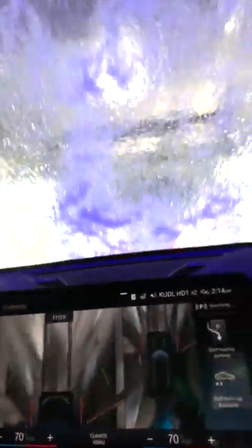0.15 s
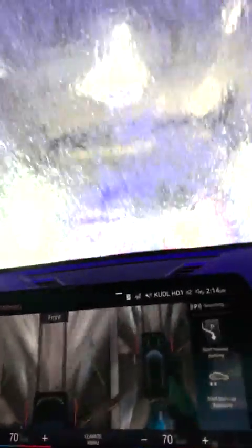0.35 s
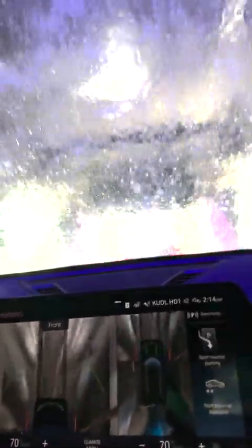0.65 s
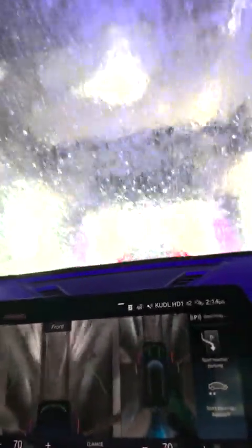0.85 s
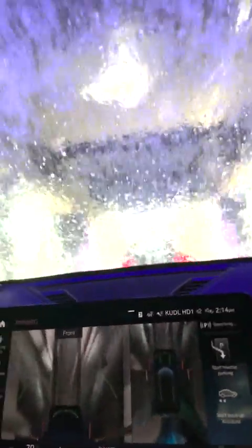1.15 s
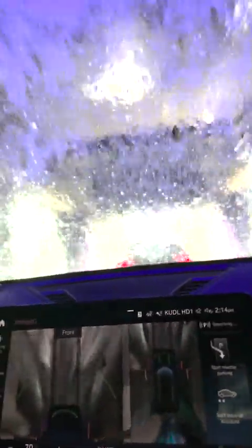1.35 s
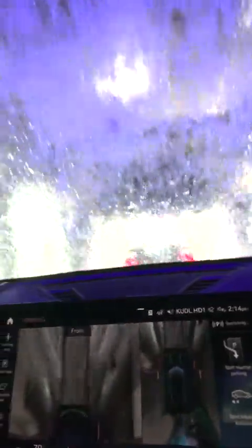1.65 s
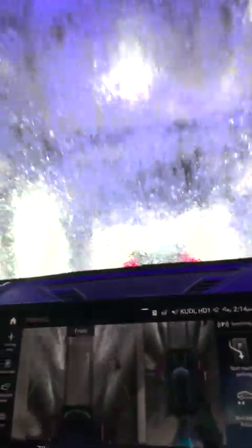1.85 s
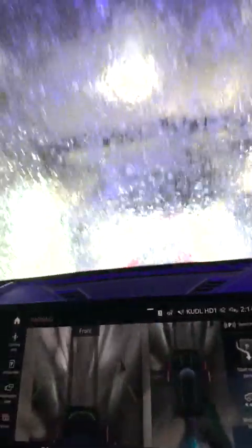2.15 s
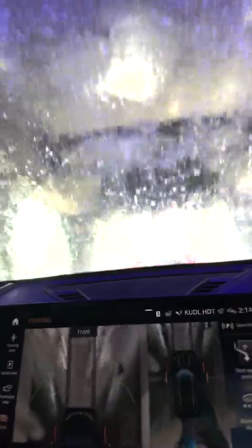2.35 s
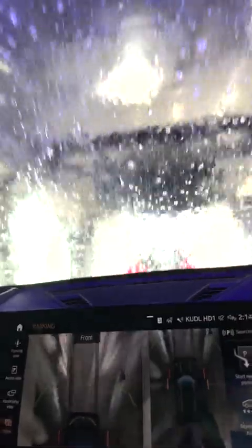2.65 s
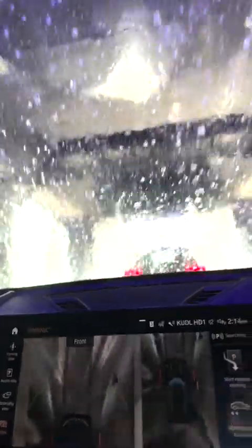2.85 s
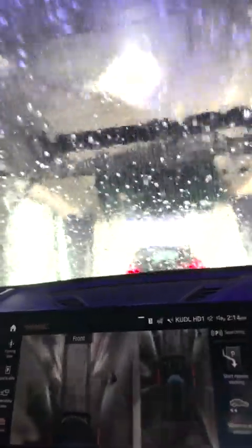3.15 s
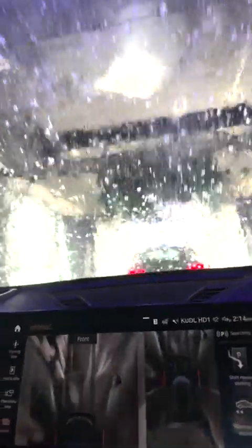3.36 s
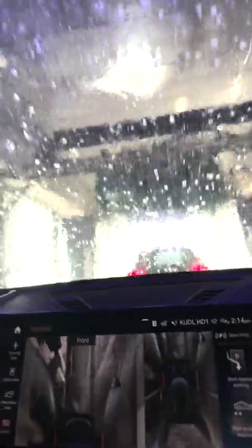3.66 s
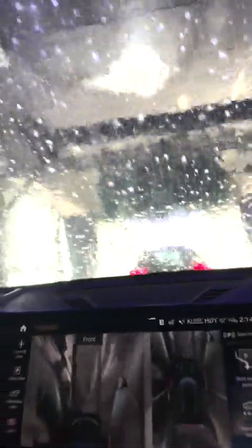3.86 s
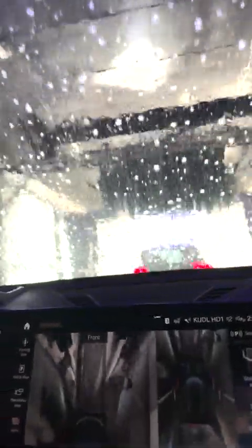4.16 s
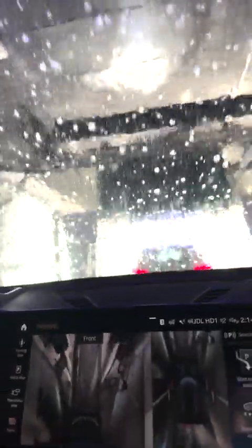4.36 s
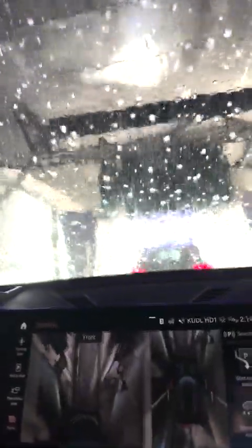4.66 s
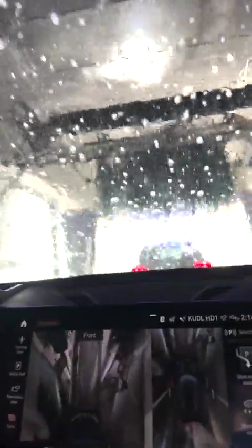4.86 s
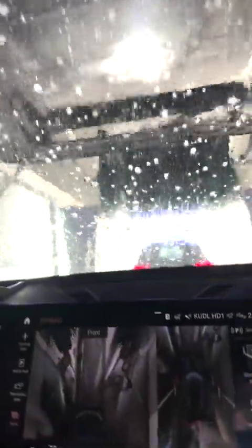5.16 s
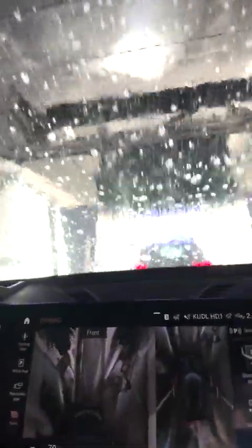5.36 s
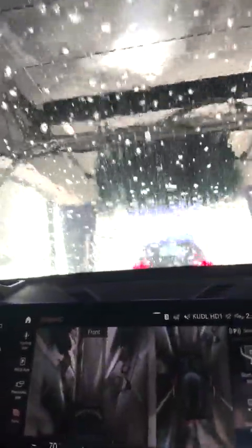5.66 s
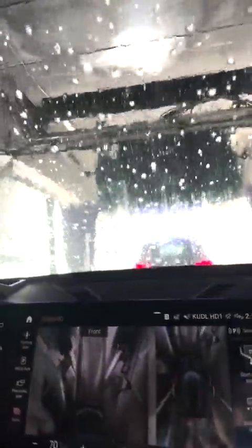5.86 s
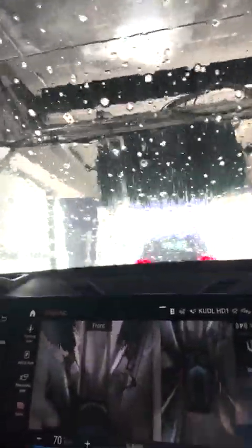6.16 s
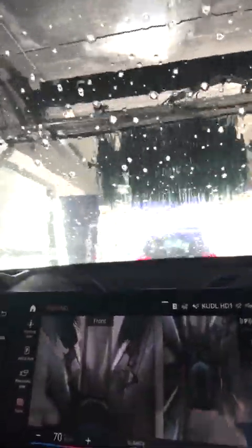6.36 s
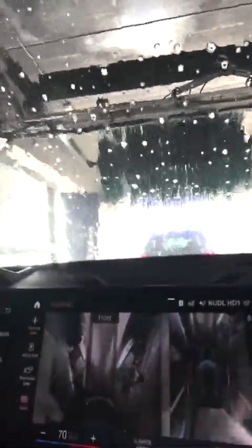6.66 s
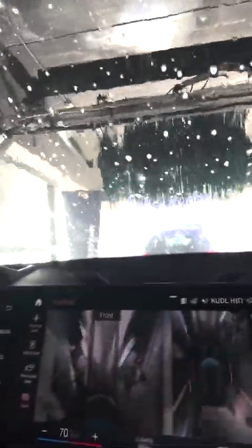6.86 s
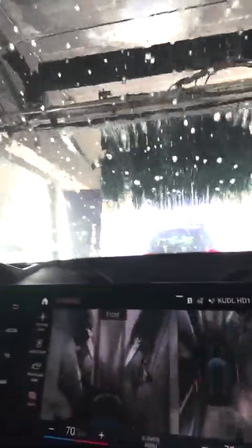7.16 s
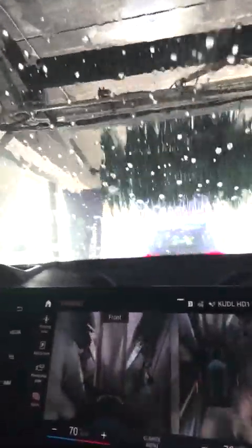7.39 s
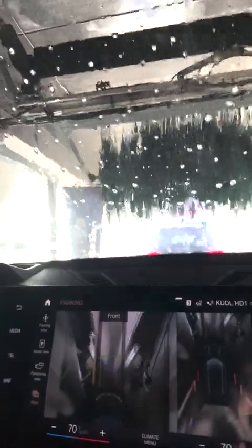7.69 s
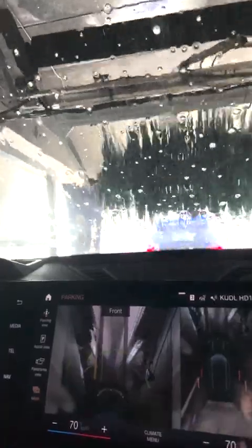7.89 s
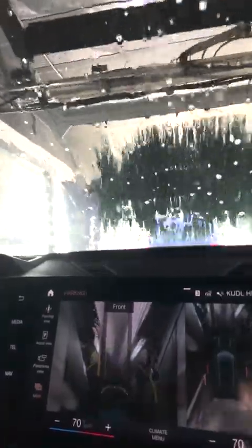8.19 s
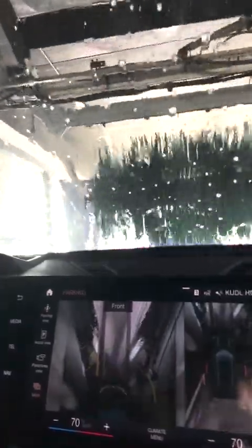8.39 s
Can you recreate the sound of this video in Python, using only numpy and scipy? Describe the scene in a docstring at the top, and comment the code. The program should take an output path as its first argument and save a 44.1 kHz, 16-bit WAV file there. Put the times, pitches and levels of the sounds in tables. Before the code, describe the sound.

Muffled car wash heard from the cabin: low rumble and thumps, swishing brushes, quick wet slaps, and a brief curtain of water across the roof.

```python
"""Wet brushes work over a closed car in a tunnel wash, heard from inside: cloth strips slap the doors
more than ten times a second, as swelling bursts of shaped noise over a steady swish and fizz.
A curtain of water, in patchy noise, patters on the windscreen and then drums along the roof; drops plink as damped tones.
Brushes and pumps shake the body: noise through resonances makes the cabin boom and the panels rumble, and blows thump.
Two close microphone ports hear the bass alike and the treble apart."""
import sys
import numpy as np
from scipy import signal
from scipy.fft import rfft, irfft, next_fast_len
from scipy.io import wavfile
from scipy.ndimage import uniform_filter1d, map_coordinates

SR = 44100
rng = np.random.default_rng(int(sys.argv[2]) if len(sys.argv) > 2 else 0)


def master_out(mix):
    """Clip the mix to full scale and print it as 16-bit PCM to the path in sys.argv[1]."""
    frames = np.transpose(np.atleast_2d(mix))
    ceiling = np.clip(frames, -1, 1)
    pcm = np.round(ceiling * 32767).astype(np.int16)
    wavfile.write(sys.argv[1], SR, pcm)


N = 376173

# How hard the body is shaken. Each row: time in seconds, cabin boom in dB, floor pan in dB, doors in dB.
SHAKING = [(0, -31.5, -31.5, -33), (.3, -30.5, -34, -33.5), (.9, -29.5, -34.5, -35.5),
           (1.4, -28.5, -31.5, -32.5), (2.0, -28.5, -34, -33.5), (2.6, -29.5, -35, -35),
           (3.1, -32.5, -35.5, -35), (3.8, -31, -34, -34), (4.3, -30, -34.5, -33.5), (4.8, -28.5, -33, -34),
           (5.27, -31, -37, -31.5), (5.5, -28.5, -30.5, -31), (6.1, -28.5, -39.5, -33.5),
           (6.4, -30.5, -33, -33), (7.0, -33.5, -39, -37), (7.3, -30, -35.5, -36), (7.9, -33.5, -36.5, -34),
           (8.53, -36, -40, -35.5)]
# Resonances of the air in the cabin. Each row: centre in Hz, width in Hz, relative level in dB.
CABIN_AIR_MODES = [(51.1, 15, 11), (38, 14, -18), (60, 9.6, -15)]
# Resonances of the floor pan. Each row: centre in Hz, width in Hz, relative level in dB.
FLOOR_PAN_MODES = [(111.5, 32, 7), (90, 31, -13)]
# Resonances of the doors. Each row: centre in Hz, width in Hz, relative level in dB.
DOOR_MODES = [(150.5, 16.7, -3), (184, 21, -6), (241, 163, -8.5)]
# Heavy brush blows that thump the cabin air (lowest), the floor pan or a door skin.
# Each row: start in seconds, pitch in Hz, rms level in dB at the top of the swell.
BLOWS = [(0.045, 110, -25.5), (0.271, 106, -25.5), (.483, 159, -26.5), (.999, 178, -26),
         (1.161, 176, -24.5), (1.335, 192, -25.5), (1.445, 183.4, -18), (2.246, 159, -30.5), (1.8, 54, -24),
         (2.18, 50, -24.5), (3.403, 115, -25), (3.937, 112, -27.5), (4.18, 49.6, -26), (4.27, 51.2, -23),
         (4.35, 108, -24), (4.406, 52, -24), (4.559, 55.4, -29), (4.64, 57, -24), (4.68, 106, -24.5),
         (4.76, 52.5, -30), (4.839, 53, -25), (4.968, 52, -20), (5.042, 54, -23), (5.095, 181, -27.5),
         (5.139, 53.6, -22), (5.236, 49.8, -19.5), (5.3, 51.3, -22.5), (5.389, 161, -28), (5.415, 50, -23),
         (5.545, 176, -27.5), (5.645, 50.5, -23), (5.793, 49, -30), (6.186, 120, -28), (6.25, 55.5, -23.5),
         (6.45, 49.8, -24)]
THUMP_RISE_S, THUMP_SLOWER = 0.017, 0.55  # swell of a 100 Hz thump; power of the pitch that lengthens lower ones

# Spray drumming on the roof. Each row: time in seconds, level in dB.
ROOF_SPRAY = [(0, -33.5), (2.4, -34), (3.2, -34), (4.1, -36), (5.1, -33.5), (5.8, -36.5), (7, -36),
              (8.53, -35.5)]
# Resonances of the roof. Each row: centre in Hz, width in Hz, relative level in dB.
ROOF_MODES = [(314, 27, 1.5), (369.4, 61, 1.5), (477, 44, -2), (550, 60, -1), (713, 47, 1), (836, 77, -4.5),
              (1240, 170, -15.5)]
# Roof modes the heavy curtain drives hardest. Each row: centre in Hz, width in Hz, relative level in dB.
CURTAIN_MODES = [(386, 47, 2.5), (473, 87, -2.5), (883, 68, -1.5)]
# The curtain crosses the roof once: it swells from the start and fades from the end.
ROOF_START_S, ROOF_SWELL_S, ROOF_END_S, ROOF_FADE_S = 0.42, 0.46, 2.23, 0.14
ROOF_CURTAIN_DB, CURTAIN_RING_DB = -28.5, -34
# Hiss on the windscreen as the curtain leaves it. Each row: time in seconds, level in dB.
GLASS_HISS = [(0, -45.5), (.43, -45), (.7, -48.5), (.9, -53.5), (1.42, -55), (2.2, -57), (2.8, -60),
              (3.4, -62.5), (6, -65.5), (7.5, -64.5), (8.53, -62.5)]
# Colour of that hiss. Each row: frequency in Hz, relative level in dB per Hz.
GLASS_COLOUR = [(2500, 9.5), (5000, 4.5), (7000, 4), (9000, 2), (10500, -6), (13000, -2), (14300, -6)]
# Water drops ticking on the glass. Each row: start in seconds, level in dB before one common trim.
GLASS_TICKS = [(0.4299, -40), (0.5082, -39), (0.706, -42), (0.7881, -43), (0.9303, -54), (0.9941, -48),
               (1.0281, -48), (1.1209, -53), (2.0812, -47), (2.7332, -50), (2.8035, -46), (2.9128, -44),
               (3.6351, -48), (3.9305, -51), (5.1183, -52), (5.3413, -49), (6.0871, -42), (6.6862, -60),
               (7.0589, -54), (7.3347, -51), (7.6944, -55), (7.8895, -44), (8.0446, -50), (8.1339, -50),
               (8.2586, -51)]

# Big drops that plink clearly. Each row: start in seconds, pitch in Hz, level in dB before onset and decay.
BIG_DROPS = [(.775, 2400, -31), (1.155, 2470, -33), (1.28, 2450, -31), (1.638, 3000, -39),
             (3.56, 2600, -41), (3.581, 3990, -37), (3.613, 4500, -42), (3.776, 2320, -41),
             (3.915, 2040, -35), (3.98, 6800, -55), (4.015, 2550, -44), (4.04, 4050, -39),
             (4.063, 4050, -42), (4.079, 3130, -40), (4.12, 2250, -28), (4.2, 4630, -43),
             (4.492, 6000, -48), (5.832, 3440, -36), (7.694, 8000, -52), (7.846, 6100, -49),
             (7.893, 6300, -48)]
PLINK_T60_S = 0.042

# Wet brushes sweeping the body. Each row: time in seconds, swish in dB, fizz in dB.
BRUSH_SWEEP = [(0.0, -41.5, -60), (0.47, -41, -69), (0.88, -37.5, -49.5), (1.47, -38.5, -54),
               (1.78, -42, -51), (2.18, -39.5, -51.5), (2.5, -44.5, -56), (3.2, -46, -53),
               (3.66, -43.5, -51.5), (4.1, -41, -51.5), (5.5, -39, -51.5), (5.94, -45, -51.5),
               (6.4, -44.5, -55), (7.15, -44.5, -54), (7.65, -41.5, -55.5), (8.53, -42, -60)]
# Colour of the swish. Each row: frequency in Hz, relative level in dB per Hz.
SWISH_COLOUR = [(200, -24), (500, -5.5), (900, 7), (1800, 0), (3500, -14), (6000, -22)]
# Colour of the fizz. Each row: frequency in Hz, relative level in dB per Hz.
FIZZ_COLOUR = [(2500, 9), (4500, 3), (6500, -5), (8000, -8), (10000, -22.5), (13400, -38), (13700, -50)]
# The clearest cloth strips hitting the body. Each row: start in seconds, reference level in dB,
# splash in dB and low knock in dB over that reference, brightness in dB (tilt of smack against thwack).
CLEAR_SLAPS = [(0.036, -34, -38, -3, -9), (0.1271, -52, -1, -8.0, 6.0), (0.165, -36, -33, 0, -8),
               (0.2375, -36, -18, -8, -4), (0.368, -37, -40, -19, -11), (0.4334, -42, -27, -12, -4),
               (0.4693, -35.5, -35, -2, 5), (0.511, -44, -13, -10.5, 0), (0.618, -44, -13.5, -6.0, -0.5),
               (0.6479, -34, -23, 0, 2), (0.7337, -35.5, -28, -11, -2.5), (0.7796, -34, -34, -13, 0),
               (0.952, -31.5, -38, 1.5, -5), (1.0755, -36.5, -19, -9, -7), (1.157, -30.5, -36, -5, -2),
               (1.274, -28.5, -35, 2, -2), (1.3633, -33.5, -36, -4, 1), (1.4366, -37.5, -22, 10, -10),
               (1.502, -32.5, -23.5, 4, 0), (1.574, -32.5, -37, -16, -5), (1.631, -32.5, -38, -22, -2),
               (1.745, -31, -23, -22, 2), (1.8073, -36, -20, -7.5, 6), (1.842, -38, -25, -11, -6),
               (1.918, -40, -19, -5, 9), (2.0153, -43, -16, -6.0, -6), (2.0834, -37.5, -18.5, -10, 0.5),
               (2.152, -40, -32, -1, -7), (2.2338, -39.5, -25, -8.5, 11), (2.46, -42.5, -17, 9, 3),
               (2.54, -42, -24, 4, 8), (2.593, -48, -15, -8, 8), (2.653, -46, -17, -6, 8),
               (2.698, -50, -12, -8, 6), (2.799, -46, -19, -6, -1.0), (2.885, -40, -25, -13, 3),
               (2.9976, -50, -11, -8, 5), (3.128, -42, -22, -6, 2), (3.165, -44, -20, -8, 2),
               (3.245, -45, -15, -8, 6), (3.288, -40, -25, -13, -2), (3.4426, -40, -21, -14, -3),
               (3.5518, -41, -32, -2, 0.5), (3.577, -34.5, -23, -1, -8), (3.6795, -38.5, -25, 0, -3),
               (3.705, -47, -28, -1, -6.0), (3.775, -43, -36, -12.0, -9), (3.869, -33, -27, 3.5, -6),
               (3.93, -37, -25, -1, -2), (3.972, -44, -13, -12, 5.5), (4.028, -43, -17, -12.0, 7),
               (4.067, -30.5, -40, -3.5, -7.5), (4.113, -32, -43, -14, -2), (4.158, -32, -28, -21, 7),
               (4.192, -35, -34, -14, 0), (4.278, -39, -31, -8, 6), (4.3276, -36.5, -26, -16, -5),
               (4.385, -34.5, -35, -26, -4), (4.504, -31.5, -24, -19, -2), (4.574, -45, -30, -2, -8),
               (4.598, -30, -33, -5, -3), (4.692, -32, -37, -15, 2), (4.807, -32.5, -23, -20, 4),
               (4.92, -32.5, -29, 2, 0), (5.063, -29, -29, -19, -1), (5.127, -33, -23, -7, 4),
               (5.19, -46, -29, -6, 10), (5.225, -35.5, -30, -2, 11), (5.245, -30.5, -24, -9, 1),
               (5.314, -29.5, -29, -17, 5.5), (5.448, -37.5, -32, -8, 6), (5.468, -37, -19.5, -7, 8),
               (5.542, -30.5, -29, 0, 2.5), (5.635, -34, -23, -16, 9), (5.743, -27.5, -32, -13, 2),
               (5.775, -36, -30, -18, 7), (5.8167, -39, -25, -17, 2), (5.856, -43, -16, -16, 0.5),
               (5.884, -38.5, -18, -15, 7.5), (5.916, -32.5, -27, -9, 0), (5.945, -39, -23, -5, -1.5),
               (5.966, -30, -37, -10, 2.5), (6.01, -40, -32, 2, -3), (6.082, -36, -17, -13, -4),
               (6.15, -35, -31, -18, 0), (6.285, -38, -26, -10, 3), (6.365, -41, -22, -9, 12),
               (6.21, -39, -27, -12, 4), (6.445, -42, -28, -12, 7), (6.558, -41.5, -30, -14, 6),
               (6.618, -44.5, -17, -14, -2), (6.8009, -41, -26, -15, -7), (6.897, -39, -24, -10, 5),
               (7.0035, -43, -24, -4, 0), (7.028, -41, -25, -10, 3), (7.158, -36.5, -29, -17, -2),
               (7.226, -43, -33, -12, -5), (7.388, -46, -30, -10, 3), (7.412, -43.5, -32, -4, -9),
               (7.5547, -43, -24, -1, -11), (7.8396, -39, -32, -13, -1), (7.886, -42.5, -21, -10, 10),
               (7.984, -50, -21, -10, 6), (8.1434, -43, -29, -14, -11), (8.2646, -41, -30, -4, 2),
               (8.3714, -41, -25, 6.5, -7)]
# Door skins knocking under a strip. Each row: centre in Hz, width in Hz, relative level in dB.
KNOCK_MODES = [(550, 120, 6.5), (920, 160, 0)]
# Colour of the lower part of a slap. Each row: frequency in Hz, relative level in dB per Hz.
THWACK_COLOUR = [(700, -5), (1200, 1.5), (1600, 1), (2200, -4), (3200, -9.5), (7000, -56)]
# Colour of the upper part of a slap. Each row: frequency in Hz, relative level in dB per Hz.
SMACK_COLOUR = [(1800, -6), (2600, 0.5), (3600, -1.5), (4800, -7), (7000, -24.5), (10000, -52)]
# Colour of the splash. Each row: frequency in Hz, relative level in dB per Hz.
SPLASH_COLOUR = [(2000, -23), (4000, 11.5), (6500, 3.5), (9000, -6), (11000, -19), (14000, -18)]
# Parts of a slap over its reference level; the splash takes its own column plus this lift.
THWACK_DB, SMACK_DB, SPATTER_DB, SPLASH_LIFT_DB = -6, -12, -12.5, 9.0
SLAP_RISE_S, SPLASH_QUICKER = 0.011, 0.66  # swell of a slap; the splash takes this share of it
CRACKLE_DB = 2  # fast flicker of wet cloth within a slap
# The tip of each strip lands a moment after its body.
TRAIL_S, TRAIL_SCATTER_S, TRAIL_DB, TRAIL_SCATTER_DB = 0.022, 0.0077, -7, 2.5
# Light slaps: reference over the swish, splash and knock over that reference, and their scatter.
LIGHT_DB, LIGHT_SPLASH_DB, LIGHT_SCATTER_DB = -3, -21, 1.8
LIGHT_KNOCK_DB, KNOCK_SCATTER_DB = -13, 2.5

# Left-right likeness, high at a cross mode of the cabin near 650 Hz that reaches the ports in opposite phase.
# Each row: frequency in Hz, likeness from 0 to 1.
PORT_LIKENESS = [(60, 0.99), (180, 1), (260, 0.77), (380, 0.73), (540, 0.32), (650, 1), (760, 0.76),
                 (1100, 0.25), (1600, 0.06), (4700, 0), (7500, 0.3), (9000, 0.2), (10700, 1), (13000, 0.1)]
# Colour difference of the ports. Each row: frequency in Hz, left over right in dB.
PORT_LEAN = [(60, 0), (130, 4), (290, 1), (620, -1.5), (1360, -0.5), (2950, 0.5), (6440, 1.0), (14000, 0.0)]
# Phase difference of the ports. Each row: frequency in Hz, left behind right in radians.
PORT_LAG = [(60, 0.25), (200, 0.049), (300, 1.85), (450, 1.58), (650, 3.28), (1100, 2.65), (2500, 3.9),
            (7500, 3), (9000, 5.93)]
TOP_HZ = 14340  # band limit


def amp(db):
    """Decibels to linear gain."""
    return 10 ** (np.asarray(db) / 20)


def unit(x):
    """Scale to rms 1."""
    return x / np.sqrt(np.mean(x ** 2) + 1e-20)


def along(points, hz):
    """Read (Hz, value) points on a log frequency axis."""
    f, v = np.transpose(points)
    return np.interp(np.log(hz + 1), np.log(f + 1), v)


def curves(rows):
    """One value per sample for each column after the time."""
    s, *columns = np.transpose(rows)
    return [np.interp(np.arange(N) / SR, s, column) for column in columns]


def wobble(rate):
    """A smooth random curve, rate knots a second."""
    return map_coordinates(rng.standard_normal(N // 100), [np.arange(N) * rate / SR])


def filtered(x, response):
    """Multiply the spectrum of x by a response of frequency."""
    m = next_fast_len(N + SR // 2)
    return irfft(rfft(x, m) * response(np.fft.rfftfreq(m, 1 / SR)), m)[..., :N]


def shape(spectrum):
    """Gain from (Hz, dB) points, falling away outside them."""
    points = [(10, -120)] + spectrum + [(SR / 2, -120)]
    return lambda hz: amp(along(points, hz))


def modes(table):
    """Gain of resonances whose powers add."""
    def power(f, c, w, db):
        return amp(2 * db) * (f * w) ** 2 / ((c * c - f * f) ** 2 + (f * w) ** 2)
    return lambda f: np.sqrt(sum(power(f, c, w, db) for c, w, db in table))


def rush(gain, patchy_db=0):
    """Noise of rms 1 at the two ports, alike by frequency, with patches of random gain in time and pitch."""
    pair = rng.standard_normal((2, N))
    if patchy_db:
        z = signal.stft(pair, nperseg=512)[2]
        field = uniform_filter1d(rng.standard_normal(z.shape[1:]), size=8, axis=0)
        field = uniform_filter1d(field, size=6, axis=1)
        pair = signal.istft(z * amp(patchy_db * unit(field)), nperseg=512)[1][:, :N]

    def mid_side_gain(hz):
        turn = np.arccos(np.clip(along(PORT_LIKENESS, hz), -1, 1)) / 2
        return gain(hz) * [np.cos(turn), np.sin(turn)]
    mid, side = filtered(pair, mid_side_gain)
    return unit(np.array([mid + side, mid - side]))


def bursts(times, levels_db, rises):
    """Envelope of overlapping bursts that swell for the rise time and die away; their powers add."""
    power, t = np.zeros(N + SR // 4), np.arange(SR // 6) / SR
    for s, db, rise in zip(times, levels_db, rises):
        u = t / max(rise, .0005)
        swell = (u * np.exp(1 - u)) ** 1.3
        power[round(s * SR):][:len(t)] += (amp(db) * swell) ** 2
    return np.sqrt(power[:N])


def thumps():
    """Each heavy blow rings one low mode that swells and dies in a few cycles."""
    out, t = np.zeros(N + SR), np.arange(SR // 4) / SR
    for s, hz, db in BLOWS:
        u = t / (THUMP_RISE_S * (100 / hz) ** THUMP_SLOWER)
        swell = (u * np.exp(1 - u)) ** 1.12
        tone = np.sqrt(2) * np.sin(2 * np.pi * (hz * t + rng.random()))
        out[round(s * SR):][:len(t)] += amp(db) * swell * tone
    return out[:N]


def body():
    """Random shaking rings the cabin air, floor and doors; the boom keeps a steadier size than plain noise."""
    boom_db, floor_db, door_db = curves(SHAKING)
    boom = rush(lambda f: modes(CABIN_AIR_MODES)(f) / (1 + (f / 80) ** 4) / (1 + (32 / (f + 1)) ** 6))
    size = np.sqrt(np.abs(uniform_filter1d(boom.sum(0) ** 2, size=2000)))
    boom = unit(boom / (size + 0.44) ** 0.16)  # gentle levelling
    floor = rush(lambda f: modes(FLOOR_PAN_MODES)(f) / (1 + (f / 150) ** 4) / (1 + (75 / (f + 1)) ** 4))
    doors = rush(lambda f: modes(DOOR_MODES)(f) / (1 + (f / 300) ** 4) / (1 + (120 / (f + 1)) ** 4))
    rumble = amp(floor_db) * floor + amp(door_db + 0.83 * wobble(11)) * doors
    return amp(boom_db) * boom + rumble + thumps()


def roof_drumming():
    """Spray and one passing curtain of water drive the roof's modes with patchy noise."""
    t = np.arange(N) / SR
    swell, fade = (t - ROOF_START_S) / ROOF_SWELL_S, 1 - (t - ROOF_END_S) / ROOF_FADE_S
    over = np.clip(np.minimum(swell, fade), 0, 1)
    spray_db, = curves(ROOF_SPRAY)
    roof_db = spray_db + over * (ROOF_CURTAIN_DB - spray_db)
    roof = lambda f: modes(ROOF_MODES)(f) / (1 + (f / 1300) ** 4) / (1 + (230 / (f + 1)) ** 4)
    drum = amp(roof_db + 0.57 * wobble(11)) * rush(roof, patchy_db=2.0)
    ring = rush(lambda f: modes(CURTAIN_MODES)(f) ** 2)
    return drum + over * amp(CURTAIN_RING_DB + 1.8 * wobble(24.35)) * ring


def windscreen_patter():
    """Many small drops make the hiss on the glass spiky, each dying in a few ms; single drops tick."""
    hiss_db, = curves(GLASS_HISS)
    sizes = amp(4.5 * rng.standard_normal(N)) * (rng.random(N) < 150 / SR)  # about 150 drops a second
    spikes = signal.lfilter([1], [1, -amp(-60 / (0.011 * SR))], sizes)
    spiky = unit(np.sqrt(1 + .15 * unit(spikes) ** 2))
    patter = amp(hiss_db + 0.95 * wobble(8)) * spiky
    s, db = np.transpose(GLASS_TICKS)
    ticks = bursts(s, db - 3.5, np.full(len(s), .002))
    return np.hypot(patter, ticks) * rush(shape(GLASS_COLOUR), patchy_db=2.0)


def curtain():
    """Falling water drums the roof and patters on the windscreen."""
    return roof_drumming() + windscreen_patter()


def plinks():
    """Each big drop rings one short damped tone."""
    out, t = np.zeros(N + SR), np.arange(SR // 10) / SR
    for s, hz, db in BIG_DROPS:
        onset = 1 - np.exp(-t / 0.0023)
        out[round(s * SR):][:len(t)] += amp(db - 60 * t / PLINK_T60_S) * np.sin(2 * np.pi * hz * t) * onset
    return out[:N] * np.array([[1], [-1]])  # offsets the ports' lag of about half a cycle: drops land near the middle


def drops(count):
    """Loose drops plink on paint and glass: short damped tones, scattered left and right, rms 1."""
    when, pitch, size, side = rng.random(count), *rng.standard_normal((3, count, 1))
    hz, t = np.clip(2600 * np.exp(.6 * pitch), 900, 7000), np.arange(800) / SR
    level = amp(2.5 * size) * (hz / 2600) ** -1.8  # higher drops are weaker
    envelope = amp(-60 * t / .025) * (1 - np.exp(-t / .002))
    tones = level * np.sin(2 * np.pi * hz * t) * envelope
    at = ((when[:, None] * N).astype(int) + np.arange(len(t))).ravel()
    ears = [np.bincount(at, (tones * amp(2 * ear * side)).ravel(), N)[:N] for ear in (1, -1)]
    return unit(np.array(ears))


def light_slaps(swish_db, count):
    """Strips that only graze the paint, at random moments, their strength following the swish."""
    at = rng.integers(0, N, count)
    size, splash, knock, bright = rng.standard_normal((count, 4)).T
    return [at / SR,
            swish_db[at] + LIGHT_DB + LIGHT_SCATTER_DB * size,
            LIGHT_SPLASH_DB + LIGHT_SCATTER_DB * splash,
            LIGHT_KNOCK_DB + KNOCK_SCATTER_DB * knock,
            LIGHT_SCATTER_DB * bright]


def strip_slaps(swish_db):
    """Each strip gives a door knock, crackling thwack and smack, flung drops and a shorter splash."""
    slaps = np.hstack([np.transpose(CLEAR_SLAPS), light_slaps(swish_db, count=40)])
    s, db, splash_db, knock_db, bright_db = slaps
    late, weak = rng.standard_normal((len(s), 2)).T
    tip_s = s + np.abs(TRAIL_S + TRAIL_SCATTER_S * late)
    tip_db = db + TRAIL_DB + TRAIL_SCATTER_DB * weak
    s, db = np.r_[s, tip_s], np.r_[db, tip_db]
    splash_db, knock_db, bright_db = np.tile([splash_db, knock_db, bright_db], 2)
    rise = np.full(len(s), SLAP_RISE_S)
    crackle = lambda: unit(amp(CRACKLE_DB * wobble(250)))

    knock = bursts(s, db + knock_db, rise) * rush(lambda f: modes(KNOCK_MODES)(f) / (1 + (f / 1200) ** 4))
    thwack = bursts(s, db + THWACK_DB - bright_db / 2, rise) * crackle() * rush(shape(THWACK_COLOUR))
    smack_burst = bursts(s, db + SMACK_DB + bright_db / 2, rise)
    smack = smack_burst * crackle() * rush(shape(SMACK_COLOUR), patchy_db=3.5)
    flung = unit(filtered(drops(count=4000), lambda f: f / (f + 2500)))
    spatter = bursts(s, db + SPATTER_DB, 1.2 * rise) * flung
    splash_burst = bursts(s, db + splash_db + SPLASH_LIFT_DB, SPLASH_QUICKER * rise)
    splash = splash_burst * crackle() * rush(shape(SPLASH_COLOUR))
    return knock + thwack + smack + spatter + splash


def brushes():
    """Wet brushes rub out a patchy swish and fizz and shed loose drops under the slaps of single strips."""
    swish_db, fizz_db = curves(BRUSH_SWEEP)
    flap = wobble(14)  # swish and fizz sway together
    swish = amp(swish_db + 0.2 * flap) * rush(shape(SWISH_COLOUR), patchy_db=2.0)
    fizz = amp(fizz_db + 0.48 * flap) * rush(shape(FIZZ_COLOUR), patchy_db=3.0)
    loose_drops = amp(swish_db - 12.0) * drops(count=1200)
    return swish + fizz + strip_slaps(swish_db) + loose_drops


def cabin(x):
    """The padded cabin answers briefly with a decaying noise tail, the same at both ports."""
    t = np.arange(SR // 4) / SR
    tail = rng.standard_normal(len(t)) * amp(-60 * t / .15) * (t > .004)
    tail = tail / np.linalg.norm(tail)
    return x + amp(-12) * signal.fftconvolve(x, tail[None], axes=1)[:, :N]


def scene():
    """Shaken body, water and drops, and the brushes with the cabin's answer."""
    return body() + curtain() + plinks() + cabin(brushes())


def record(dry):
    """The two ports differ in colour and phase, half the difference each way; nothing passes the band limit."""
    def ports(hz):
        half = amp(along(PORT_LEAN, hz) / 2) * np.exp(-.5j * along(PORT_LAG, hz))
        return np.array([half, 1 / half]) * (hz < TOP_HZ)
    return filtered(dry, ports)


dry = scene()
out = record(dry)
master_out(out)
```